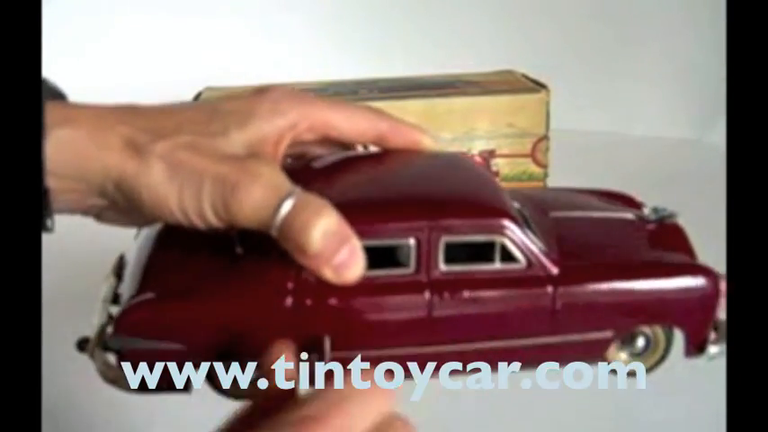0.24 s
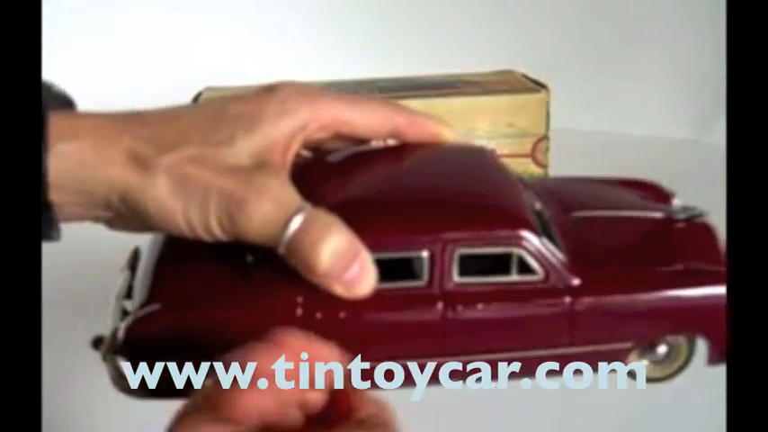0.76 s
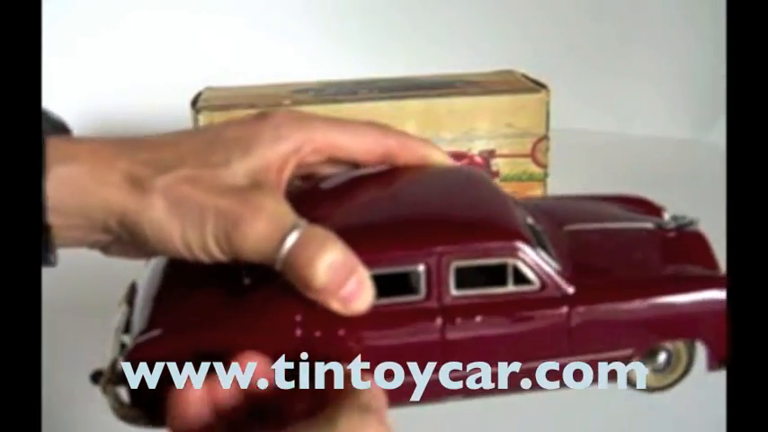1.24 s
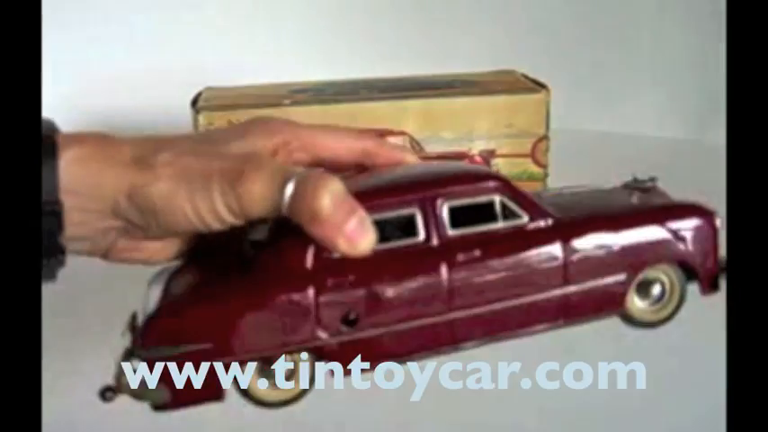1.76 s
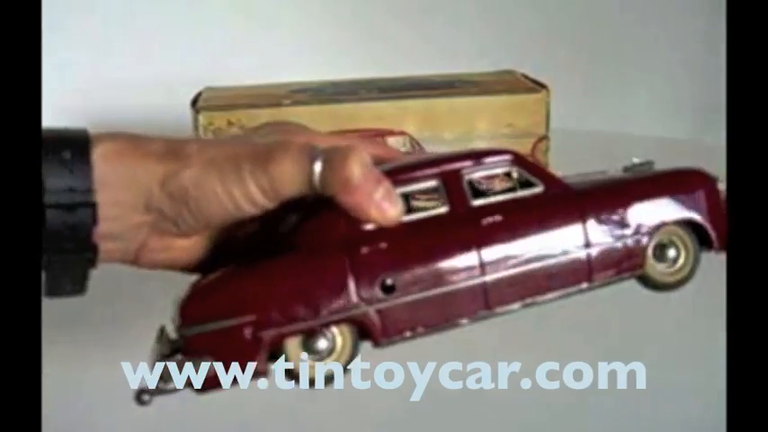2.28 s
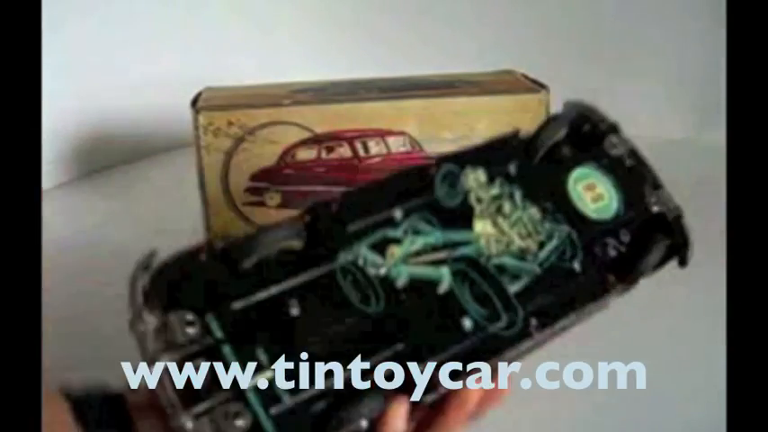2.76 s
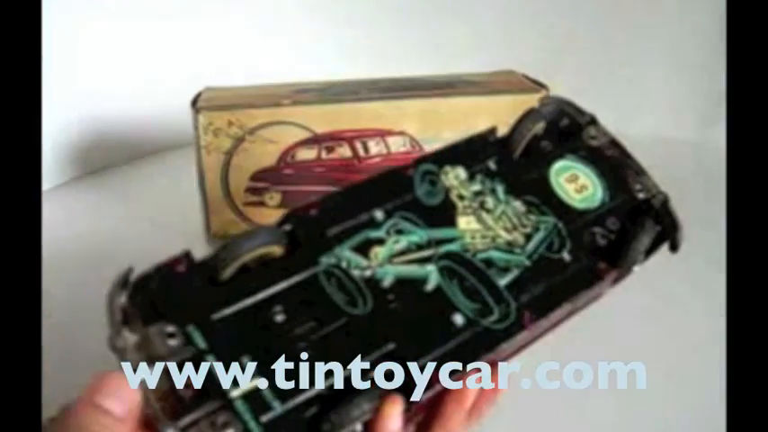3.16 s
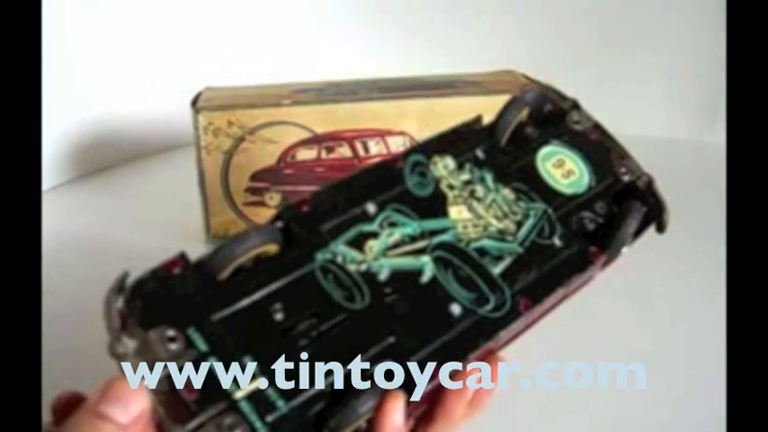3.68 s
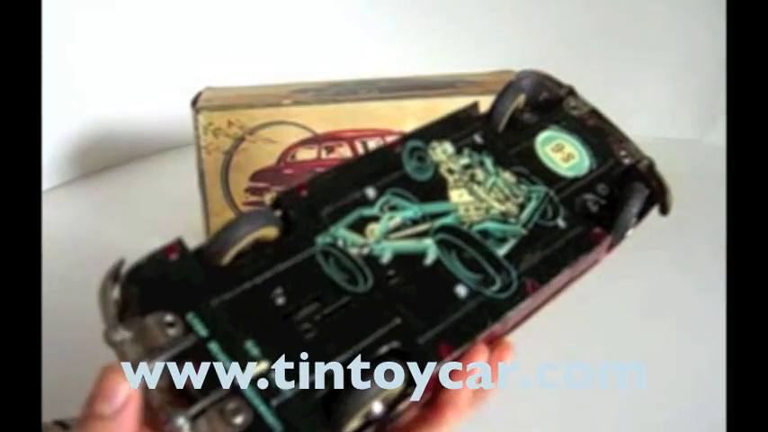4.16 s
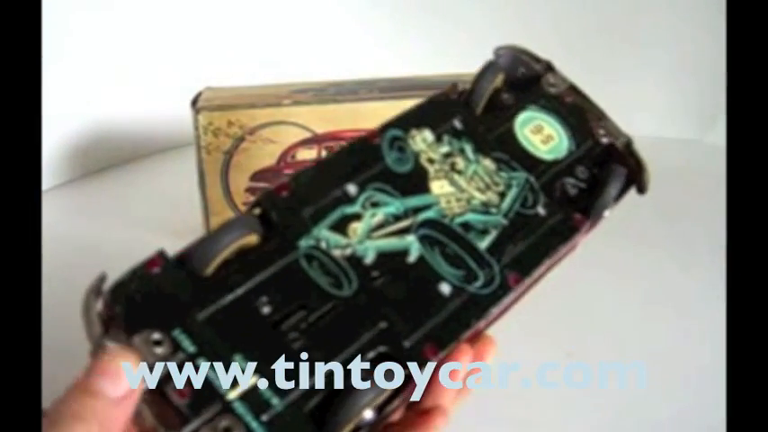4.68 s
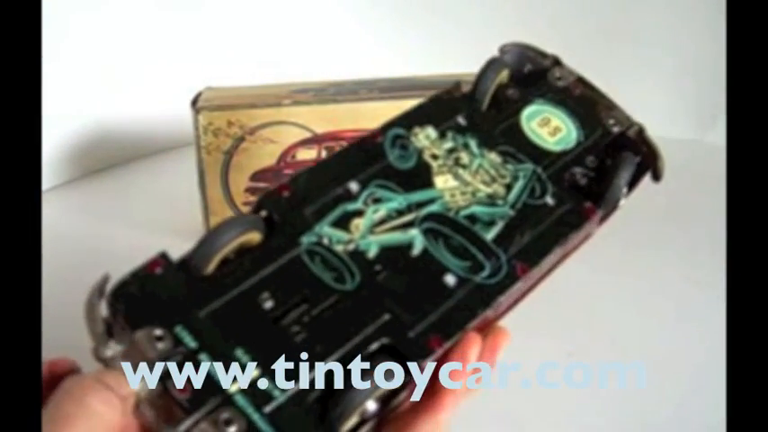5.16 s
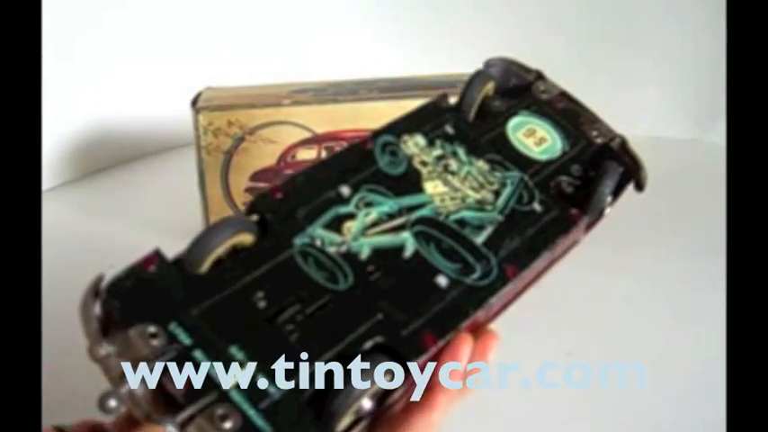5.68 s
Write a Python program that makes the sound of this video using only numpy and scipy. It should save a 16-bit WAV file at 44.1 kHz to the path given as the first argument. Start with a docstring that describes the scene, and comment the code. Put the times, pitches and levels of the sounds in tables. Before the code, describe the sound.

A quiet room with faint steady hiss and a low wavering hum, captured close by a small microphone. At 0-0.05 s a couple of tinny clicks; from 0.45 to 0.6 s a fast cluster of hard, bright ratchet clicks, the loudest at 0.47 s, ringing briefly in a hollow tin shell. Weaker clicks follow to 0.85 s, with a small group near 1.17 s. From about 1.8 to 2.7 s fingers rub softly, the shell gives tiny groans and loose parts tick as the car is turned over. Distinct clacks sound at 3.14 and 3.40 s, with lighter ones after. At 3.93 s the spring motor spins up quickly into a dense, harsh gear rattle with boomy body and buzzing drone, gradually easing until it stops sharply around 4.9 s. From 5 s the works coast very quietly and duller, with small knocks, clustered around 5.65-5.85 s.

```python
"""In a quiet room with faint hiss and hum, a clockwork tin car is handled close to a small microphone.
Key, ratchet and loose parts click: short bursts of contacts ring the modes of the tin shell.
Fingers rub on it as it is turned over (coloured noise), and the gripped shell groans (narrow noise).
The spring motor is let go for a second: tooth blows and rattle shake the shell, which booms and drones.
Then the works coast on quietly, through the same gears with a duller tone."""
import sys
import numpy as np
from scipy import signal
from scipy.fft import rfft, irfft, next_fast_len
from scipy.io import wavfile
from scipy.ndimage import uniform_filter1d

SR = 44100
rng = np.random.default_rng(int(sys.argv[2]) if len(sys.argv) > 2 else 0)


def materialize(psi):
    """Save the field psi as 16-bit PCM at rate SR to the path in sys.argv[1].

    A 1-D psi becomes a single channel; in a 2-D psi each row is a channel.
    """
    bounded = np.clip(np.atleast_2d(psi).T, -1, 1)
    quanta = np.round(bounded * 32767).astype(np.int16)
    wavfile.write(sys.argv[1], SR, quanta)


N = 261513
TIME = np.arange(N) / SR


def undb(db):
    """Decibels to gain."""
    return 10 ** (np.asarray(db) / 20)


def unit(x):
    """Scale to rms 1."""
    return x / np.sqrt(np.mean(x ** 2) + 1e-18)


def unit_energy(x):
    """Scale a response so that it passes noise at gain 1."""
    return x / np.sqrt(np.sum(x ** 2) + 1e-18)


def fade(t, t60):
    """Free decay, 60 dB down after t60 seconds."""
    return np.exp(-np.log(1000) * t / t60)


def swell(s, half_length):
    """A smooth rise and fall around time s."""
    return np.exp(-((TIME - s) / half_length) ** 2)


def walk(rate):
    """Smooth random wander of rms 1, with a new target rate times a second."""
    k = int(SR / rate)
    steps = np.repeat(rng.standard_normal(N // k + 1), k)
    return unit(uniform_filter1d(steps, k)[:N])


def band(x, lo_hz, hi_hz):
    """Causal band-pass."""
    return signal.sosfilt(signal.butter(3, [lo_hz, hi_hz], "bandpass", fs=SR, output="sos"), x)


def colour(x, points):
    """Causal (minimum-phase) filter with the given (f/Hz, level/dB) response."""
    hz, db = np.transpose(points)
    n = next_fast_len(2 * len(x))
    f = np.maximum(np.arange(n // 2 + 1) * SR / n, 1)
    response_db = np.interp(np.log(f), np.log(hz), db)
    # folding the cepstrum onto positive time makes the filter causal
    cepstrum = irfft(np.log(undb(response_db)), n)
    cepstrum[1:n // 2] *= 2
    cepstrum[n // 2 + 1:] = 0
    return irfft(rfft(x, n) * np.exp(rfft(cepstrum)), n)[:len(x)]


def add(out, s, x):
    """Mix x into out from time s."""
    i = max(int(s * SR), 0)
    out[i:i + len(x)] += x[:N - i]


# spectrum of the room hiss: (f/Hz, level/dB per Hz, relative)
AIR = [(15, -39.5), (25, -6.5), (92, -7), (140, -14.5), (181, -9.5), (223, -12.5), (294, -13), (448, -13.5),
       (635, -13), (696, -15.5), (2500, -19), (3230, -20), (4480, -20), (6500, -37), (8450, -78),
       (14300, -120)]
AIR_DB, HUM_DB, HUM_HZ = -48.5, -53, 47  # middle levels, around which both waver


def background():
    """Faintly flickering hiss and a low hum that wavers in phase and level."""
    hiss = unit(colour(rng.standard_normal(N), AIR)) * undb(AIR_DB + 1.1 * walk(43))
    hum = np.sin(2 * np.pi * HUM_HZ * TIME + 0.54 * walk(5.1))
    return hiss + hum * undb(HUM_DB + 1.6 * walk(39))


# ringing modes of the tin shell: (f/Hz, level/dB)
SHELL_MODES = [(772, -2), (850, 0), (977, -5), (1083, -3), (1112, -3), (1245, -8), (1408, -5), (1828, -2),
               (2051, -4), (2090, -6), (2298, -6), (2470, -8), (2765, -7), (3229, -4), (3752, -9),
               (3792, -7), (4817, -1), (4880, -5), (5010, -4)]
# the crowd of short-lived panel modes between them: (f/Hz, level/dB)
PANELS = [(100, -34), (350, -12), (670, -13.5), (790, -5.5), (1100, -0.5), (1400, -3), (1600, -7.5),
          (2050, -2), (2600, -6), (3250, -7), (4350, -8), (4880, -2), (5400, -13.5), (6300, -12)]


def shell(ring_db, ring_t60, panel_t60, crack_db):
    """The shell's answer to one tap: a crack, a wash of panel modes and the longer tin ring."""
    t = TIME[:SR // 4]
    hz, db = np.transpose(SHELL_MODES)[:, :, None]
    sign = rng.choice([-1, 1], hz.shape)  # each mode starts inward or outward
    t60 = ring_t60 * np.sqrt(hz.min() / hz)  # high modes die sooner
    modes = sign * undb(db) * np.sin(2 * np.pi * hz * t) * fade(t, t60)
    ring = np.sum(modes, axis=0)
    wash = unit_energy(rng.standard_normal(len(t)) * fade(t, panel_t60))
    wash[0] += undb(crack_db)
    panels = unit_energy(colour(wash, PANELS))
    return unit_energy(panels + undb(ring_db) * unit_energy(ring))


CLICK_DB = -0.47  # gain on top of every click's own level
CLICK_SHELL = dict(ring_db=-11.5, ring_t60=.18, panel_t60=0.026, crack_db=10.5)
SEAM_DB, SEAM_T60_S = -20.5, .15  # buzz of loose seams after a click
THUD_DB, THUD_HZ, THUD_WIDTH_OCT = 4.5, 328, 1  # the chassis thumps under each blow
PART_WIDTH_OCT, PART_RING_DB, PART_T60_S = 0.28, -12, 0.036  # the struck part


def click(level_db, bright_db, part_hz, part_db, chatter_ms):
    """Metal chatters on metal for a few ms; harder contact is brighter, and the struck part rings too."""
    t = TIME[:SR // 8]
    age = t / (chatter_ms / 1000)
    bounces = rng.choice([-1, 1], len(t)) * (rng.random(len(t)) < .3)
    chatter = age ** 0.62 * np.exp(-1.3 * age)
    # loose tabs and seams buzz on after the blow
    seams = undb(SEAM_DB) * fade(t, SEAM_T60_S) * (1 - np.exp(-age))
    contact = bounces * (chatter + seams)
    tin = signal.fftconvolve(contact, shell(**CLICK_SHELL))[:SR // 4]

    hz = np.geomspace(100, 8000, 60)
    tilt = bright_db * np.log2(np.maximum(hz / 1000, 1))  # dB per octave above 1 kHz
    part = part_db * np.exp(-(np.log2(hz / part_hz) / PART_WIDTH_OCT) ** 2)
    thud = THUD_DB * np.exp(-(np.log2(hz / THUD_HZ) / THUD_WIDTH_OCT) ** 2)
    hit = unit_energy(band(colour(tin, np.c_[hz, tilt + part + thud]), 200, 7300))

    # the struck part has a close pair of modes
    after = TIME[:len(hit)]
    upper = np.sin(2 * np.pi * part_hz * .985 * after)
    lower = 0.32 * np.sin(2 * np.pi * (part_hz * 0.92 * after + rng.random()))
    onset = 1 - np.exp(-after / 0.00039)
    part_ring = (upper + lower) * fade(after, PART_T60_S) * onset
    hit += undb(PART_RING_DB + part_db) * unit_energy(part_ring)

    loudest = np.sqrt(uniform_filter1d(hit ** 2, size=90).max())  # rms over 2 ms
    return hit / loudest * undb(level_db + CLICK_DB)


# metal clicks: (t/s, level/dB before CLICK_DB, brightness/dB per octave,
# struck part f/Hz, its prominence level/dB, chatter time scale/ms)
CLICKS = [(0.001, -27.5, -2.5, 923, 1.5, 2.1), (0.039, -18.5, -4.5, 1780, 1.5, 1.65),
          (0.271, -38.5, -4.5, 1830, 8.5, 4), (0.32, -31, 1.5, 4490, 5, 3.6),
          (0.377, -28.5, 1.5, 1262, 0, 9.8), (0.454, -24.5, -1, 1730, -11, 5),
          (0.466, -9.5, 4.5, 2970, 3, 2.9), (0.495, -16, 1.5, 5200, 2, 1.1), (0.512, -27, 10, 4500, -2, 2),
          (0.518, -13, 4, 4720, 4.5, 1.7), (0.545, -13.5, 2, 4190, 5, 1.9), (0.587, -17.5, 4, 4780, 3, 2.6),
          (0.593, -15, 3, 3990, 8.5, 3.6), (0.61, -30, -3, 3800, 1, 2.3),
          (0.705, -28.5, 1.5, 1000, 5.5, 13.7), (0.754, -22.5, 1.5, 5020, -0.5, 4.6),
          (0.808, -36.5, -10, 980, 4, 4), (0.852, -27.5, -1, 1320, 3, 3.3),
          (1.167, -35.5, -2.5, 3340, 5, 6), (1.176, -29.5, 1, 4260, 4, 3),
          (1.188, -23.5, -2, 1800, -1.5, 8.9), (1.79, -32, -3, 825, 0, 4), (1.877, -32.5, -8, 894, 7, 3.6),
          (1.968, -34, -12, 1010, -5, 2.2), (2.011, -20.5, 2, 4990, 0.5, 2.3),
          (2.119, -38, 0, 1560, 9, 7.7), (2.27, -37, 3, 870, 9.5, 5.1), (2.31, -37.5, 0.5, 4450, 5, 5.1),
          (2.462, -36.5, -3, 804, 3, 27), (2.498, -27, 0.5, 838, 10.5, 4.6),
          (2.561, -25.5, -2.5, 1900, 8.5, 4.9), (2.594, -21.5, 1.5, 2286, 4.5, 4.2),
          (2.65, -37, 1, 796, 5, 4), (2.745, -39, -1, 2190, 7, 3.4), (2.995, -39.5, 0.5, 2140, 8, 1.7),
          (3.131, -29, -2, 2320, 6, 2.7), (3.139, -18.5, 2, 2243, 7, 4.9),
          (3.366, -30, -1.5, 1880, 3.5, 4.9), (3.393, -31, 1.5, 3430, 4, 9.9),
          (3.403, -15, 1, 1105, -1, 7.2), (3.417, -26.5, -3, 2700, 0, 4.2),
          (3.754, -31.5, -3.5, 1790, 2, 8.8), (3.823, -28, -1, 2130, 5, 7), (3.841, -29, -1, 1810, 2, 14.3),
          (3.943, -29.5, 4, 1160, 2, 6), (5.343, -24.5, -6, 888, 2, 9.3), (5.575, -33.5, -3, 1910, 3, 5),
          (5.65, -24.5, -7.5, 800, 1, 7.1), (5.658, -32.5, -6, 3330, 9, 3.4),
          (5.713, -35, -3.5, 1160, 7, 7), (5.789, -29, 4.5, 1120, 20, 3), (5.809, -24, -3, 1850, 9.5, 3.8),
          (5.833, -28, -1, 2193, 6, 5.1)]


def clicks():
    """Key, ratchet and chassis knock in the shell."""
    out = np.zeros(N)
    for s, *blow in CLICKS:
        add(out, s, click(*blow))
    return out


def room(x, wet_db, t60, gap_s):
    """Table and walls answer with a short diffuse tail."""
    t = TIME[:SR // 2]
    build_up = 1 - np.exp(-(t / gap_s) ** 2)
    tail = band(rng.standard_normal(len(t)), 190, 6400) * fade(t, t60) * build_up
    return x + undb(wet_db) * signal.fftconvolve(x, unit_energy(tail))[:N]


# strokes of the hand over the car: (firmest grip t/s, rise t/s, fall t/s, level/dB)
STROKES = [(2.0, 0.29, 0.12, -41.5), (2.63, 0.17, 0.46, -46)]
# short groans of the gripped shell: (t/s, half length t/s, f/Hz, width f/Hz, level/dB)
GROANS = [(1.793, 0.044, 476, 350, -40.5), (1.882, 0.0057, 868, 190, -34.5),
          (2.024, 0.011, 450, 350, -31.5), (2.099, 0.028, 418, 270, -37), (2.25, 0.078, 113, 16, -49.5),
          (2.507, 0.011, 800, 200, -34), (5.51, 0.12, 111.6, 11.5, -52)]


def hand():
    """Skin slides over the paint in uneven strokes and now and then grabs, so that the shell groans."""
    grip = np.zeros(N)
    for s, rise, fall, db in STROKES:
        grip += undb(db) * np.exp(-np.maximum((s - TIME) / rise, (TIME - s) / fall))
    skin = [(60, -7.5), (180, -3.5), (400, -1), (700, -11.0), (1400, -13.5), (2700, -14.5), (6000, -29.0)]
    rub = unit(colour(rng.standard_normal(N), skin))
    out = rub * grip * undb(1.9 * walk(40))
    for s, half_length, hz, width, db in GROANS:
        grab = swell(s, half_length)
        groan = band(rng.standard_normal(N), hz - width / 2, hz + width / 2) * grab
        out += undb(db) * unit_energy(groan) * np.sqrt(np.sum(grab ** 2))
    return out


# when loose parts tick, as the car is turned over and as the works coast: (from t/s, to t/s)
LOOSE_SPANS = [(1.9, 2.4), (5.05, 5.9)]
LOOSE_PER_S = 6
LOOSE_DB, LOOSE_SPREAD_DB = -40, 1.5  # before CLICK_DB
LOOSE_BRIGHT_DB_PER_OCT, LOOSE_HZ, LOOSE_CHATTER_MS = -4, 1660, 5


def loose_parts():
    """Faint ticks, one at a chance moment in each short slot, while the car is in motion."""
    out = np.zeros(N)
    for start, end in LOOSE_SPANS:
        for slot in np.arange(start, end, 1 / LOOSE_PER_S):
            s = min(slot + rng.random() / LOOSE_PER_S, end)
            level_db = LOOSE_DB + LOOSE_SPREAD_DB * rng.standard_normal()
            part_hz = LOOSE_HZ * 2 ** (rng.random() - .5)  # within half an octave either way
            add(out, s, click(level_db, LOOSE_BRIGHT_DB_PER_OCT, part_hz, 0, LOOSE_CHATTER_MS))
    return out


# gear speed: (t/s, teeth per second f/Hz)
SPEED = [(3.93, 140), (4.08, 173.6), (4.25, 189.8), (4.5, 191.1), (4.7, 189.5), (4.9, 186), (5.93, 130.9)]


def tooth_phase():
    """Count of gear teeth that have passed."""
    s, teeth_per_s = np.transpose(SPEED)
    return np.cumsum(np.interp(TIME, s, teeth_per_s)) / SR


def gear_train(ring_db, ring_t60, crack_db, wobble_db):
    """Three axles shake the shell through both bearings: teeth strike, loose wheels rattle in their play."""
    out = np.zeros(N)
    for ratio in (1, 1.13, .41) * 2:  # tooth rate of each axle, once per bearing
        phase = ratio * tooth_phase() + .15 * walk(120) + rng.random()
        teeth = np.diff(np.floor(phase), prepend=0) * undb(2 * rng.standard_normal(N))
        knocks = rng.choice([-1, 1], N) * (rng.random(N) < 2400 / SR)  # about 2400 a second
        rattle = knocks * np.exp(0.26 * np.cos(2 * np.pi * phase))  # harder once per tooth
        blows = (unit(rattle) + undb(-6) * unit(teeth)) * undb(wobble_db * walk(90))
        tin = shell(ring_db, ring_t60, panel_t60=0.021, crack_db=crack_db)
        out += signal.fftconvolve(blows, tin)[:N]
    return unit(out)


# the shell booms as the running gears press on it: (t/s, half length t/s, level/dB)
BOOMS = [(4.054, 0.013, -19), (4.096, 0.021, -21.5), (4.25, 0.01, -23), (4.567, 0.024, -21)]
# the floor pan drones with the teeth: (t/s, half length t/s, multiple of tooth rate, middle level/dB)
DRONES = [(4.09, 0.064, 1, -42), (4.4, 0.18, 1, -37.5), (4.57, 0.071, 2, -31.5), (4.683, 0.11, 2, -36.5),
          (4.404, .05, 3, -38), (4.84, .06, 1, -43.5)]
# borders between body, clank and tick of the gears: (f/Hz)
BAND_EDGES_HZ = [1550, 2900]
RUN_START_S, RUN_END_S, STOP_DB_PER_S = 3.9263, 4.883, 220
SPIN_UP_S, SPIN_UP_POWER = 0.16, 1.25  # length and steepness of the rise
RUN_DB, UNWIND_DB, UNWIND_S = -26, 6.5, .4  # slack spring; extra when tight, and its decay time constant
CLANK_DB, TICK_DB, TIGHT_TICK_DB = -2.5, 3, 2.5  # middle, treble against the body; extra treble when tight


def motor():
    """The spring drives the gears, which shake the shell and make the floor pan drone; it weakens and stops."""
    age = np.maximum(TIME - RUN_START_S, 0)
    spin = np.minimum(age / SPIN_UP_S, 1) ** SPIN_UP_POWER
    tight = np.exp(-np.maximum(age - SPIN_UP_S, 0) / UNWIND_S)
    stop_db = STOP_DB_PER_S * np.maximum(TIME - RUN_END_S, 0)
    drive = spin * undb(RUN_DB + UNWIND_DB * tight - stop_db)

    tin = gear_train(ring_db=-4, ring_t60=0.14, crack_db=16.0, wobble_db=2.5)
    body, body_and_clank = (
        signal.sosfiltfilt(signal.butter(4, hz, fs=SR, output="sos"), tin) for hz in BAND_EDGES_HZ)
    clank = undb(CLANK_DB) * unit(body_and_clank - body)
    tick = undb(TICK_DB + TIGHT_TICK_DB * tight) * unit(tin - body_and_clank)
    # the whole car trembles in the hand
    shudder = undb(-29) * unit(band(rng.standard_normal(N), 35, 160))

    boom = sum(undb(db) * swell(s, half_length) for s, half_length, db in BOOMS)
    booming_body = unit(body) * np.hypot(drive, boom)

    teeth = 2 * np.pi * tooth_phase()
    drone = np.zeros(N)
    for s, half_length, multiple, db in DRONES:
        tone = np.sin(round(multiple) * teeth + 0.5 * walk(50))
        drone += undb(db) * swell(s, half_length) * tone
    return (clank + tick + shudder) * drive + booming_body + drone * undb(2 * walk(40))


COAST_START_S, COAST_DB, COAST_WAVER_DB = 4.98, -44.5, -0.6  # middle level and its waver


def coasting():
    """Without the spring's pull the wheels spin on, touching softly, so the tin sings duller."""
    tin = gear_train(ring_db=0, ring_t60=0.25, crack_db=16, wobble_db=5.0)
    soft = signal.sosfilt(signal.butter(1, [250, 2700], "bandpass", fs=SR, output="sos"), tin)
    free = np.clip((TIME - COAST_START_S) / .02, 0, 1)
    return unit(soft) * undb(COAST_DB + COAST_WAVER_DB * walk(11)) * free


def scene():
    """The car and the hand in the room."""
    car = clicks() + hand() + loose_parts() + motor() + coasting()
    return (room(car, wet_db=-14.5, t60=0.27, gap_s=0.0057) + background())[None]


TOP_HZ, CLIP_LEVEL, CUT_HZ = 6270, .73, 15800


def record(dry):
    """The recorder dulls the treble above TOP_HZ; peaks past CLIP_LEVEL clip with a spit kept below CUT_HZ."""
    dull = signal.sosfiltfilt(signal.butter(18, TOP_HZ, fs=SR, output="sos"), dry)
    clipped = np.clip(dull, -CLIP_LEVEL, CLIP_LEVEL)
    return signal.sosfiltfilt(signal.butter(16, CUT_HZ, fs=SR, output="sos"), clipped)


dry = scene()
out = record(dry)
materialize(out)
```